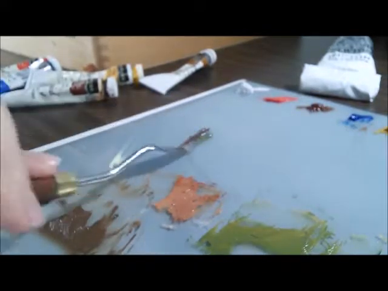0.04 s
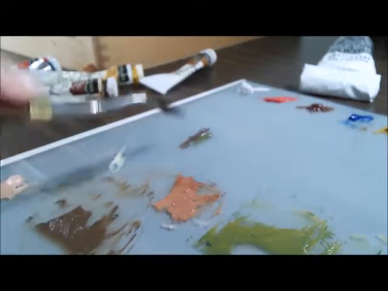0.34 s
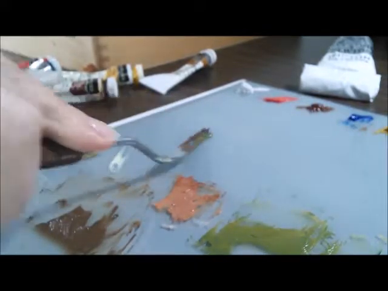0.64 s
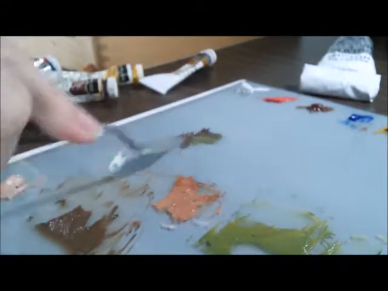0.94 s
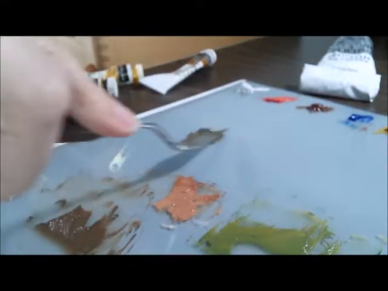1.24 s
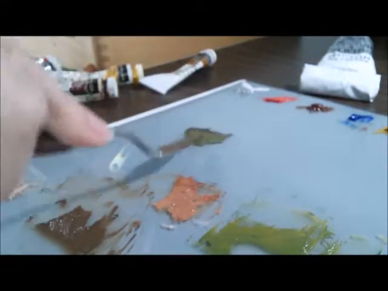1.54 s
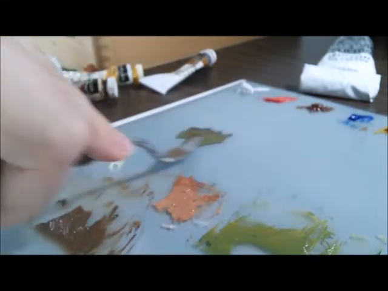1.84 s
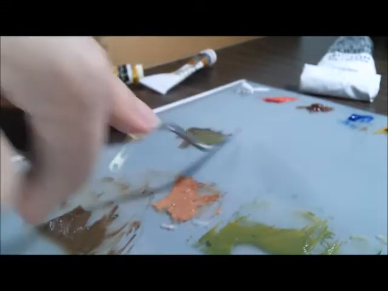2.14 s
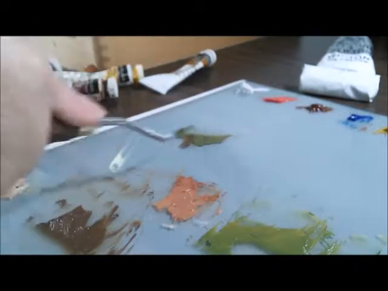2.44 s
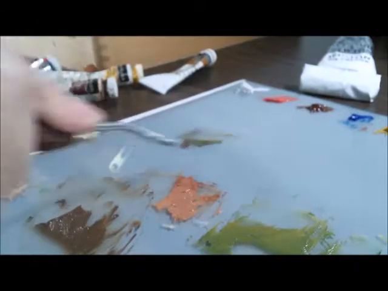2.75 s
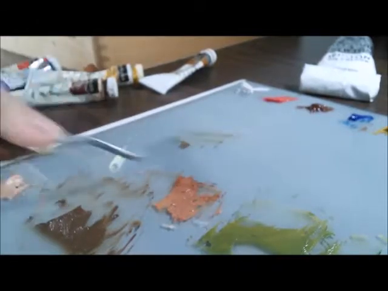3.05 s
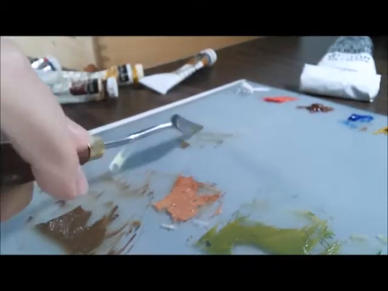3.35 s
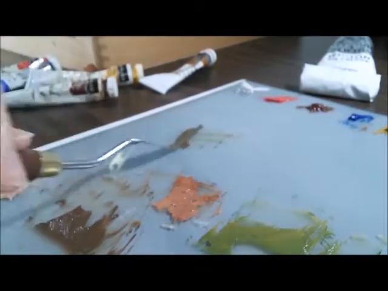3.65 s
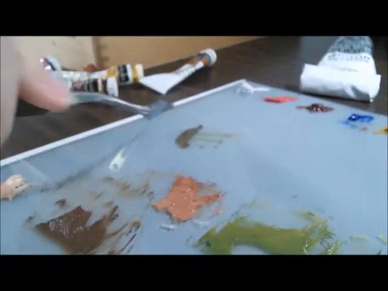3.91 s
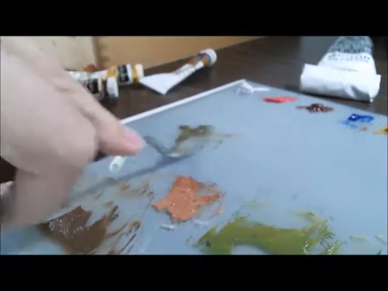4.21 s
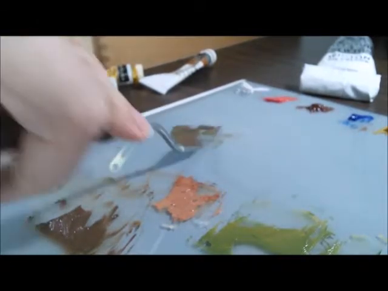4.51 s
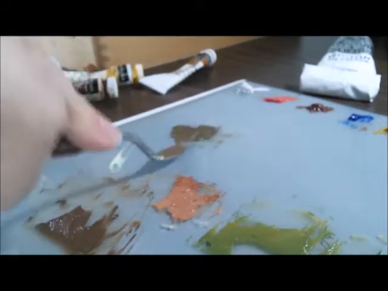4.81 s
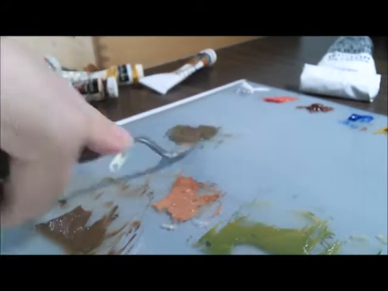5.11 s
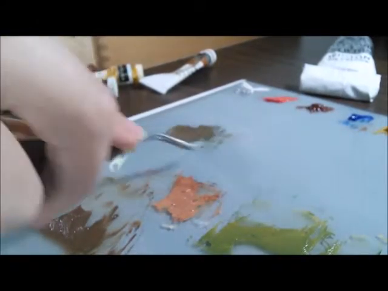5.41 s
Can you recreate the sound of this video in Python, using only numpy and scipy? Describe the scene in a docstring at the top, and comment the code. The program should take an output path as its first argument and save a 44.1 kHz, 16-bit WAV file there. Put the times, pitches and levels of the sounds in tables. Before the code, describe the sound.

A steel palette knife mixes thick paint on a glass slab, heard close in a small room with a steady fan-like rush. It starts with light taps and sticky drags while the desk thuds softly under the hand. The edge then clinks and scrapes more sharply, and the whole blade slaps down with a short chatter. Softer wet strokes follow, then a sharp tap, a dry rasp and a brief bright hiss.

```python
"""A steel palette knife mixes thick paint on a glass slab on a desk, in a small room with a fan-like rush.
After a faint swish, the blade taps the glass and drags through sticky paint from 0.5 s; the desk thuds
under the hand. From 2.5 s the edge clinks and scrapes the paint together, until the whole blade slaps
down and chatters at 3.2 s. A second swish and softer strokes follow, then a sharp tap at 5 s.
After a last rasp on bare glass, a short bright hiss swells at the end."""
import sys
import numpy as np
from scipy import signal
from scipy.fft import rfft, irfft, next_fast_len
from scipy.io import wavfile
from scipy.ndimage import uniform_filter1d

SR = 44100
rng = np.random.default_rng(int(sys.argv[2]) if len(sys.argv) > 2 else 0)


def wrap_up_sound(samples):
    """Save the sound to the file named by the first command line argument, as 16-bit audio."""
    columns = np.atleast_2d(samples).T
    # keep every value between -1 and 1, then stretch to whole-number steps
    tamed = np.clip(columns, -1, 1)
    steps = np.round(tamed * 32767).astype(np.int16)
    wavfile.write(sys.argv[1], SR, steps)


N = 249939
TIME = np.arange(N) / SR


def from_db(db):
    """Decibels to gain."""
    return 10 ** (np.asarray(db) / 20)


def rms_one(x):
    """Scale to unit rms."""
    return x / np.sqrt(np.mean(x ** 2) + 1e-20)


def attack_one(x):
    """Scale a hit to unit rms over its first five milliseconds."""
    return x / np.sqrt(np.mean(x[:SR // 200] ** 2))


def add(out, s, sound):
    """Mix a sound in from time s on."""
    start = round(s * SR)
    out[start:start + len(sound)] += sound[:N - start]


def in_time(rows):
    """Each column of an automation curve at every sample."""
    s, *columns = np.transpose(rows)
    return [np.interp(TIME, s, c) for c in columns]


def during(rows):
    """A gate, open from the first point of a curve to its last."""
    return (TIME >= rows[0][0]) & (TIME <= rows[-1][0])


def arches(movements, narrowness=0.35):
    """Envelope of movements that swell and die away."""
    power = np.zeros(N)
    for start, end, db in movements:
        progress = np.clip((TIME - start) / (end - start), 0, 1)
        power += (from_db(db) * np.abs(np.sin(np.pi * progress)) ** narrowness) ** 2
    return np.sqrt(power)


def drift(per_s):
    """A random modulator, rms 1."""
    knots = rng.standard_normal(N // 40)
    return rms_one(np.interp(TIME * per_s, np.arange(len(knots)), knots))


def coloured_noise(colour):
    """Noise through an EQ curve, falling 30 dB an octave beyond its ends, rms 1."""
    hz, db = np.transpose(colour)
    size = next_fast_len(N)
    grid = np.maximum(np.fft.rfftfreq(size, 1 / SR), 1)
    skirts_db = -30 * np.abs(np.log2(grid / np.clip(grid, hz[0], hz[-1])))
    gain = from_db(np.interp(np.log(grid), np.log(hz), db) + skirts_db)
    return rms_one(irfft(rfft(rng.standard_normal(size)) * gain)[:N])


def band(force, hz, width_hz):
    """One steep-sided resonance."""
    sos = signal.butter(2, [hz - width_hz / 2, hz + width_hz / 2], "band", fs=SR, output="sos")
    return signal.sosfilt(sos, force + 1e-18)


def resonate(force, modes):
    """A force through parallel resonances, rms 1."""
    return rms_one(sum(from_db(db) * band(force, hz, width_hz) for hz, width_hz, db in modes))


def gliding(force, hz, width_hz):
    """A resonance with moving pitch: the low-passed force ring-modulates a sine, rms 1."""
    flutter = signal.sosfilt(signal.butter(2, width_hz / 2, fs=SR, output="sos"), force + 1e-18)
    return rms_one(flutter * np.sin(2 * np.pi * np.cumsum(hz) / SR))


def slips(per_s, spread_db):
    """Friction grains: tiny random slips of uneven size."""
    sizes = from_db(spread_db * np.minimum(rng.exponential(1, N), 3.5)) * rng.choice([-1, 1], N)
    return sizes * (rng.random(N) < per_s / SR)


def sticking(per_s, spread_db, grip_db):
    """Slips under a grip that tightens and loosens."""
    return slips(per_s, spread_db) * from_db(grip_db * drift(per_s=100))


def struck(modes, detune):
    """One impulse into resonances of alternating sign, each a little random in level and pitch."""
    out, blow = 0, signal.unit_impulse(SR // 16)
    for k, (hz, width_hz, db) in enumerate(modes):
        shift, offset_db = rng.uniform(-1, 1, 2)
        out = out + (-1) ** k * from_db(db + offset_db) * band(blow, hz * (1 + detune * shift), width_hz)
    return attack_one(out)


def crunch(modes, t60_s):
    """Steel chatters on glass for an instant: a dying burst into broad resonances."""
    t = TIME[:SR // 16]
    burst = rng.choice([-1, 1], len(t)) * from_db(-60 * t / t60_s) * (1 - np.exp(-t / 0.000047))
    return attack_one(resonate(burst, modes))


def by_tilt(mix, tilt):
    """Gain of each layer as the blade tilts: 0 flat, 0.5 on its edge, 1 on its tip."""
    return [from_db(np.interp(tilt, np.linspace(0, 1, len(db)), db)) for db in mix.values()]


def room(x, t60_s=0.3, gap_s=0.00237, wall_hz=14000):
    """Short reverb: dense reflections from desk and walls, a little dulled."""
    t = TIME[:SR // 2]
    tail = rng.standard_normal(len(t)) * from_db(-60 * t / t60_s) * (t > gap_s)
    walls = signal.butter(1, wall_hz, fs=SR, output="sos")
    return signal.fftconvolve(x, signal.sosfilt(walls, tail / np.linalg.norm(tail)))[:N]


# EQ of the room tone: (frequency [Hz], level [dB])
RUSH_COLOUR = [(25, -20), (55, -12), (150, -17.5), (300, -16.5), (430, -12), (600, -0.5), (950, -1),
               (1300, -8.5), (2000, -6.5), (3000, -18.5), (4800, -22.5), (7000, -31.5), (11000, -32),
               (16000, -32)]
# its fan-like resonances: (frequency [Hz], width [Hz], level [dB])
FAN_MODES = [(625.4, 19, 0.94), (738, 7.3, -1.68), (923.6, 24.7, -0.65)]

def fan(rush_db=-56, tones_db=-59.5, waver_db=3):
    """The bed: a steady rush with three resonances that each swell and sink on their own."""
    tones = sum(from_db(db + waver_db * drift(per_s=18)) * band(rng.standard_normal(N), hz, width_hz)
                for hz, width_hz, db in FAN_MODES)
    return from_db(rush_db) * coloured_noise(RUSH_COLOUR) + from_db(tones_db) * rms_one(tones)


# one falling sweep per swish: (time [s], frequency [Hz], level [dB])
SWISHES = [
    [(0, 6050, -73), (0.05, 5750, -69), (0.12, 5400, -85)],
    [(3.55, 7200, -85), (3.59, 6600, -72), (3.635, 5650, -64), (3.67, 5150, -67), (3.72, 4900, -85)],
]

def swishes(width_hz=720):
    """Thin swishes: narrow bands of noise slide down in pitch."""
    out = 0
    for curve in SWISHES:
        hz, db = in_time(curve)
        out = out + during(curve) * from_db(db) * gliding(rng.standard_normal(N), hz, width_hz)
    return out


# fade-in of the hiss: (time [s], level [dB])
HISS_SWELL = [(5.57, -82), (5.61, -62), (5.63, -49), (5.648, -38), (5.7, -37)]
# its EQ: (frequency [Hz], level [dB])
HISS_COLOUR = [(3500, -30), (5400, -9), (6200, -7), (6900, -16), (7500, 4.5), (8100, -1), (9700, -1.5),
               (10300, -11), (11000, -6), (12100, -5), (13500, -14), (16000, -30)]

def hiss():
    """Bright noise swells quickly at the very end."""
    db, = in_time(HISS_SWELL)
    return during(HISS_SWELL) * from_db(db) * coloured_noise(HISS_COLOUR)


# faint high tones: (time [s], level [dB])
HIGH_TONES = [(1.229, -52), (1.628, -56), (2.633, -54), (2.818, -51), (5.011, -39)]
# their resonances: (frequency [Hz], width [Hz], level [dB])
HIGH_TONE_MODES = [(3265, 110, 0), (5730, 150, 1), (6350, 250, -7), (7080, 120, -2)]

def high_tones():
    """Faint, brief high ringing tones near 3.3 and 5.7-7 kHz."""
    out = np.zeros(N)
    for s, db in HIGH_TONES:
        add(out, s, from_db(db) * struck(HIGH_TONE_MODES, detune=0.029))
    return out


# the hand presses down: (start [s], end [s], crest [dB])
PUSHES = [(0.62, 0.8, -62), (0.8, 1.08, -55.5), (1.24, 1.48, -53.5), (1.48, 1.78, -52.5), (2.06, 2.18, -52),
          (2.74, 2.82, -56), (3.165, 3.265, -50), (3.57, 3.67, -65), (4.48, 4.69, -58), (4.75, 4.95, -57),
          (5.01, 5.24, -57), (5.3, 5.52, -56.5)]
# EQ of the desk's rumble: (frequency [Hz], level [dB])
DESK_COLOUR = [(22, -25), (45, 7.5), (70, 6), (125, 4.5), (170, -8.5), (240, -14.5), (400, -17)]
# thuds of desk and slab: (time [s], level [dB], pitch [Hz])
THUDS = [(0.904, -36, 107), (0.914, -46, 786), (1.050, -43, 706), (1.152, -44.5, 913), (1.263, -38.5, 116),
         (1.282, -39, 76), (1.509, -33.5, 137), (1.543, -32, 146), (1.967, -33.5, 108.7),
         (2.108, -35.5, 90), (2.726, -42, 760), (3.186, -32.5, 118), (3.221, -38, 503), (3.379, -46, 617),
         (3.935, -44, 68), (4.625, -44, 125), (4.722, -41.5, 754), (4.816, -43, 136), (4.896, -47.5, 121),
         (4.945, -46.5, 905), (5.09, -37.5, 104.6)]

def desk(rise_s=0.0058):
    """Pressure rocks the slab on the desk: an uneven rumble and dead thuds."""
    judder = from_db(2.5 * drift(per_s=35))
    out = arches(PUSHES) * judder * coloured_noise(DESK_COLOUR)
    t = TIME[:SR // 8]
    swell = (t / rise_s * np.exp(1 - t / rise_s)) ** 2
    for s, db, hz in THUDS:
        add(out, s, -from_db(db) * swell * np.sin(2 * np.pi * hz * t))
    return out


# rubs on the slab: (start [s], end [s], crest [dB])
RUBS = [(0.62, 1.2, -58.5), (1.2, 1.85, -57.5), (1.8, 2.3, -54.5), (2.28, 2.56, -54), (2.56, 3.05, -58.5),
        (3.28, 3.55, -62.5), (4.2, 4.58, -61.5), (4.7, 4.92, -60), (4.92, 5.35, -58)]
# their midrange EQ: (frequency [Hz], level [dB])
RUB_COLOUR = [(300, -34), (520, -0.5), (750, 2.5), (930, 5), (1300, -5), (1650, -7.5), (2200, -4.5),
              (2800, -16), (4000, -24)]
# groans of the slab: (start [s], end [s], crest [dB])
GROANS = [(1.67, 1.71, -52.5), (2.37, 2.47, -53.5), (4.75, 4.8, -51)]
# their resonance: (frequency [Hz], width [Hz], level [dB])
GROAN_MODES = [(925, 117, 0)]

def rubs():
    """The flat of the blade rubs the slab, which now and then groans under it."""
    rubbing = arches(RUBS) * from_db(drift(per_s=30)) * coloured_noise(RUB_COLOUR)
    groaning = arches(GROANS) * resonate(rng.standard_normal(N), GROAN_MODES)
    return rubbing + groaning


# wet smacks: (start [s], end [s], crest [dB])
SMACKS = [(0.925, 0.955, -60), (1.042, 1.08, -60.5), (1.27, 1.292, -57.5), (1.62, 1.65, -58),
          (2.235, 2.27, -77), (2.625, 2.64, -58), (2.912, 2.935, -54), (3.3, 3.335, -63),
          (3.955, 3.995, -62.5), (4.286, 4.305, -50.5), (4.72, 4.74, -57)]
# their top-end sizzle: (frequency [Hz], width [Hz], level [dB])
SMACK_MODES = [(12800, 1000, 12), (13600, 1300, -10)]

def smacks():
    """Sticky paint pulls apart in a spray of tiny clicks."""
    return arches(SMACKS) * resonate(slips(per_s=2500, spread_db=3.5), SMACK_MODES)


# the edge rasps: (start [s], end [s], crest [dB])
RASPS = [(4.487, 4.55, -56.5), (5.435, 5.55, -58.5)]
# body of the rasp: (frequency [Hz], width [Hz], level [dB])
RASP_MODES = [(1052, 254, 4), (1718, 670, 1), (2556, 220, 3), (3930, 1740, -2)]
# the blade chatters after the slap: (start [s], end [s], crest [dB])
CHATTERS = [(3.222, 3.245, -39.5), (3.245, 3.275, -52)]
# ring of the chatter: (frequency [Hz], width [Hz], level [dB])
CHATTER_MODES = [(3260, 110, -5), (4750, 150, -1), (5350, 130, 1), (5780, 150, 1), (6300, 400, -6)]

def scrapes():
    """Steel on bare glass: coarse slips rasp and chatter."""
    rasping = arches(RASPS) * resonate(slips(per_s=1100, spread_db=3), RASP_MODES)
    chattering = arches(CHATTERS) * resonate(slips(per_s=2500, spread_db=2), CHATTER_MODES)
    return rasping + chattering


# the flat slap: (time [s], level [dB])
SLAPS = [(3.2182, -27)]
# its hollow ring: (frequency [Hz], width [Hz], level [dB])
SLAP_MODES = [(1470, 130, 3), (1660, 140, 0), (2100, 260, -10), (3265, 170, -4), (4750, 300, -8),
              (5380, 190, 1), (5850, 220, 0), (6450, 500, -7)]

def slap():
    """The whole blade slaps down and the slab sounds hollow."""
    out = np.zeros(N)
    for s, db in SLAPS:
        add(out, s, from_db(db) * struck(SLAP_MODES, detune=0.008))
    return out


# resonances of a tap, damped by paint and fingers: (frequency [Hz], width [Hz], level [dB])
SLAB_MODES = [(830, 220, -8), (1590, 170, 0), (2560, 340, -11), (3290, 200, -16)]
BARE_BLADE_MODES = [(2700, 300, -12.5), (4600, 280, 0), (4980, 340, -13), (5340, 270, -1.5)]
BEDDED_BLADE_MODES = [(2740, 340, -24), (4700, 260, -12), (4950, 280, 0), (5200, 300, -15)]  # in paint they merge into one peak
EDGE_MODES = [(6850, 480, 1.5), (8900, 900, -2), (11000, 2600, -2.5)]
TIP_MODES = [(12900, 1600, 1), (14500, 1800, -2)]
# blade, edge and tip layers: (level [dB] at even steps of tilt from flat to tip)
TAP_MIX = {"blade": (0, -0.31, -18.5), "edge": (-26, -23, -4.5, -9.5, -48), "tip": (-23, -11, -2, -1, 0.5)}
# blade meets glass: (time [s], level [dB], tilt [0-1], relative knock [dB], bedding in paint [0-1])
TAPS = [(0.5168, -55, .25, -12, .8), (0.5285, -51, .35, -18, .9), (0.774, -44.5, .28, -16, 1),
        (0.917, -42, .1, -6, .45), (1.0525, -55, .2, 4, .5), (1.1555, -41.5, .02, -2, .35),
        (1.212, -45.5, .05, -14, .9), (1.348, -47.5, .08, -2, .25), (1.4646, -54, .85, -16, .8),
        (2.1639, -42.5, .15, 0, 0), (2.4925, -31, .47, -8, .3), (2.5505, -34, .54, -24, .65),
        (2.669, -55, .6, -15, .8), (2.7168, -24.5, .5, -9, .15), (2.7975, -48, .75, -15, .6),
        (2.818, -41.5, .62, -15, .6), (2.8942, -26.5, .55, -10, .2), (2.919, -46, .9, -15, .5),
        (2.97, -48, .95, -15, .5), (3.2182, -29.5, .52, -14, .7), (3.326, -52, .8, -9, .5),
        (3.3823, -52, .7, 1, .5), (4.184, -57, .4, -15, .8), (4.2853, -46, .98, -25, .8),
        (4.394, -47.5, .2, -12, .6), (4.4645, -49, .2, -18, 1), (4.4817, -42, .22, -16, 1),
        (4.4965, -47, .25, -6, .9), (4.508, -49, .7, -7, .8), (4.5145, -49, .3, -7, 1),
        (4.534, -50, .3, -12, 1), (4.724, -49, .85, -5, .5), (4.774, -55, .95, -15, .5),
        (4.8854, -58, .6, -5, .5), (5.011, -25, .48, -21, .1), (5.107, -51, .5, -15, .6),
        (5.155, -50, .2, -15, .6), (5.3757, -38, .2, -3, 0), (5.442, -47, .25, -15, .2),
        (5.4955, -48, .35, -6, .5), (5.5308, -47, .25, -7, .6)]

def taps():
    """The knife knocks the slab and rings; its edge and tip add a bright clink."""
    out = np.zeros(N)
    for s, db, tilt, knock_db, bedding in TAPS:
        blade, edge, tip = by_tilt(TAP_MIX, tilt)
        knock = from_db(knock_db) * struck(SLAB_MODES, detune=0.025)
        modes = (1 - bedding) * np.array(BARE_BLADE_MODES) + bedding * np.array(BEDDED_BLADE_MODES)
        ring = blade * struck(modes, detune=0.008)
        clink = edge * crunch(EDGE_MODES, t60_s=0.01)
        tick = tip * crunch(TIP_MODES, t60_s=0.005)
        add(out, s, from_db(db) * (knock + ring + clink + tick))
    return out


# drag and crackle layers of a slide: (flat [dB], on the edge [dB], on the tip [dB])
SLIDE_MIX = {"drag": (-2, -11, -33), "crackle": (-16, 0, 0)}

def slide(length_s, db, fade_db, tilt, dryness, dry_grit_db=-1.5, wet_loss_db=13.5):
    """Power of drag, crackle and grit in one fading slide; wet paint muffles the grit."""
    grit = from_db(dry_grit_db - wet_loss_db * (1 - dryness))
    envelope = from_db(db - np.linspace(0, fade_db, round(length_s * SR)))
    return np.outer([*by_tilt(SLIDE_MIX, tilt), grit], envelope) ** 2


def slide_envelopes(moves, hits, ease_db=6, ramp_s=0.01, skid_s=0.53, skid_db=-27, skid_db_per_s=125):
    """Gains of drag, crackle and grit: strokes start firmly and ease off, and each tap skids to rest."""
    slides = [(start, slide(end - start, db + ease_db / 2, ease_db, tilt, dryness))
              for start, end, db, tilt, dryness in moves]
    for s, db, tilt, _, _ in hits:
        rolled = tilt + 0.1  # the skid rolls the blade a little further up
        skid = slide(skid_s, db + skid_db, skid_db_per_s * skid_s, rolled, dryness=0.75)
        slides.append((s + ramp_s, skid))
    power = np.zeros((3, N))
    for s, parts in slides:
        for track, part in zip(power, parts):
            add(track, s, part)
    width = round(ramp_s * SR)
    return np.abs(uniform_filter1d(uniform_filter1d(np.sqrt(power), width), width))


# grinding pigment and tearing paint: (frequency [Hz], width [Hz], level [dB])
GRIT_MODES = [(1920, 2500, 3), (3450, 2400, 0), (5860, 1200, 7.5), (6960, 680, 2), (8400, 3900, -6.5),
              (12250, 6300, -8)]
CRACKLE_MODES = [(13150, 2100, 0), (14700, 1800, -6.5), (11600, 3700, -8.5)]
# the blade is drawn through the paint: (start [s], end [s], level [dB], tilt [0-1], dryness [0-1])
STROKES = [(0.514, 0.55, -50, 0.12, 0.02), (0.69, 0.822, -60.5, 0.13, 0.1), (0.946, 1.103, -60, 0.03, 0.12),
           (1.203, 1.368, -60.5, 0.026, 0.33), (1.604, 1.69, -59, 0.13, 0.7),
           (1.782, 2.044, -62, 0.19, 0.38), (2.203, 2.379, -58, 0.28, 0.44), (2.546, 2.591, -48, 0.5, 0.86),
           (2.602, 2.653, -58, 0.47, 1), (2.715, 2.762, -45.5, 0.82, 0.85),
           (2.77, 2.833, -54.5, 0.79, 0.54), (2.89, 3.004, -52.5, 1, 0.3), (3.27, 3.446, -71, 0.51, 0.96),
           (3.957, 4.03, -65, 0.27, 0), (4.064, 4.179, -57.5, 0.027, 0), (4.216, 4.297, -55.5, 0.058, 0),
           (4.301, 4.382, -65, 0.37, 0.2), (4.383, 4.455, -54, 0.15, 0.2), (4.495, 4.556, -54, 0.18, 0.5),
           (4.714, 4.779, -62, 0.33, 0.57), (5.03, 5.118, -52, 0.7, 0), (5.163, 5.242, -54, 0.26, 0.1),
           (5.432, 5.561, -52, 0.21, 0.88)]

def strokes(wet_hz=4950, waver_hz=60, dry_rise_hz=280, dry_waver_hz=260):
    """The blade sticks and slips: it rings, grinds pigment on the glass and tears threads of paint."""
    drag, crackle, grit = slide_envelopes(STROKES, TAPS)
    dryness, = in_time([(s, dry) for start, end, _, _, dry in STROKES for s in (start, end)])
    # on drier glass the ring rises and wavers more
    wobble_hz = (waver_hz + dry_waver_hz * dryness) * drift(per_s=120)
    ring_hz = wet_hz + dry_rise_hz * dryness + wobble_hz
    ringing = drag * gliding(sticking(per_s=8000, spread_db=1, grip_db=3), ring_hz, width_hz=360)
    coarse = dict(per_s=2500, spread_db=5, grip_db=4)
    grinding = grit * resonate(sticking(**coarse), GRIT_MODES)
    tearing = crackle * resonate(sticking(**coarse), CRACKLE_MODES)
    return ringing + grinding + tearing


def scene(reverb_db=-14):
    """Mono mix: knife and desk close up over the room tone, with reverb on the knife and high tones."""
    background = fan() + swishes() + hiss() + desk()
    foreground = rubs() + smacks() + scrapes() + high_tones() + slap() + taps() + strokes()
    return (background + foreground + from_db(reverb_db) * room(foreground))[None]


def record(dry):
    """A steep high cut at 15.9 kHz on the whole mix."""
    return signal.sosfilt(signal.ellip(10, .2, 70, 15900, fs=SR, output="sos"), dry)


dry = scene()
out = record(dry)
wrap_up_sound(out)
```